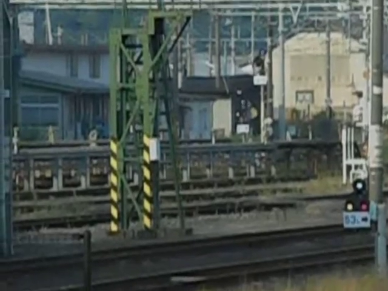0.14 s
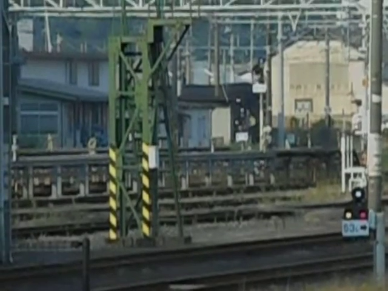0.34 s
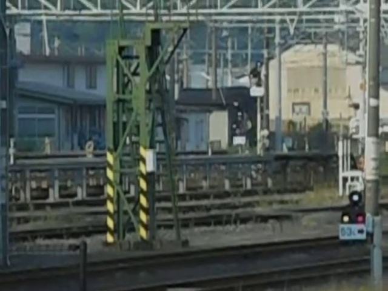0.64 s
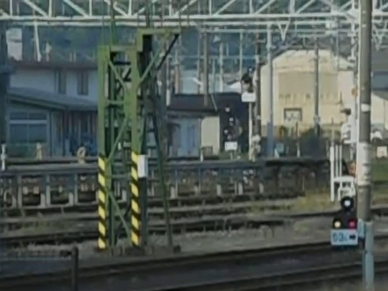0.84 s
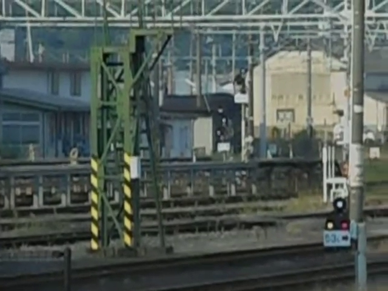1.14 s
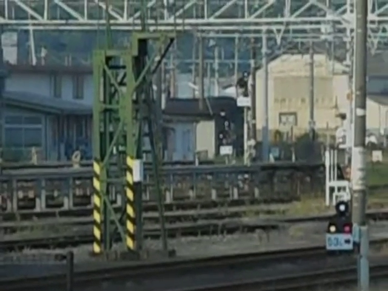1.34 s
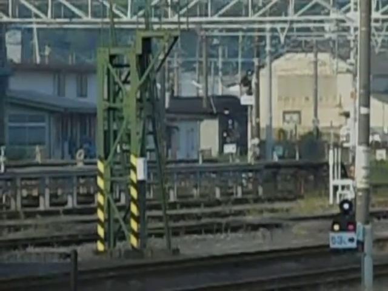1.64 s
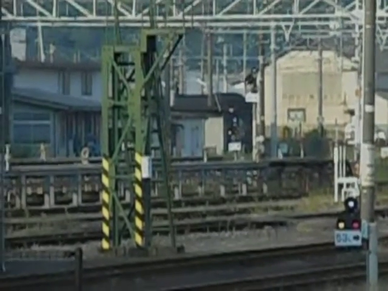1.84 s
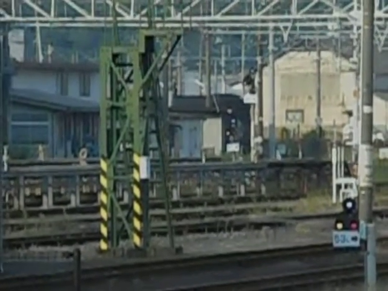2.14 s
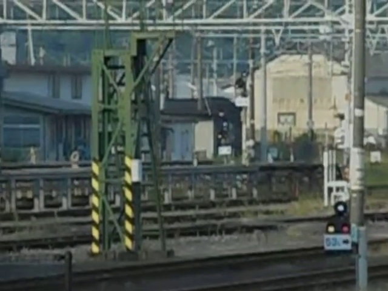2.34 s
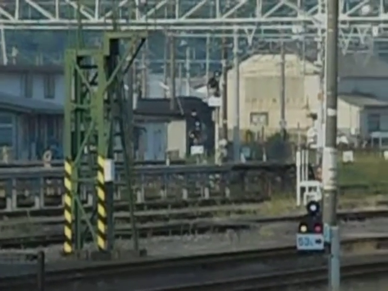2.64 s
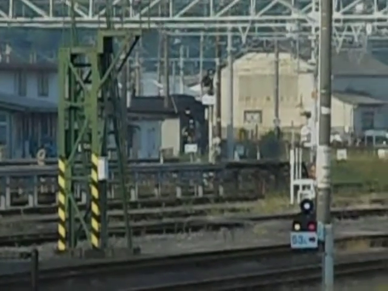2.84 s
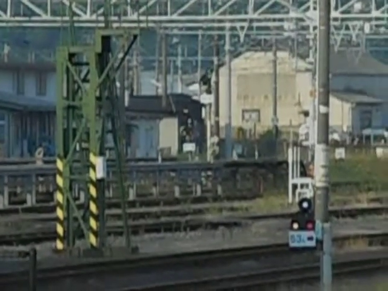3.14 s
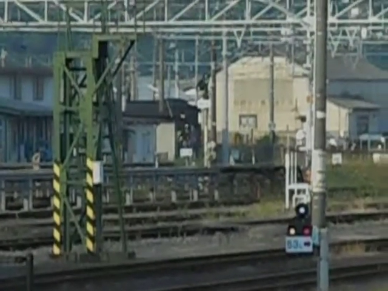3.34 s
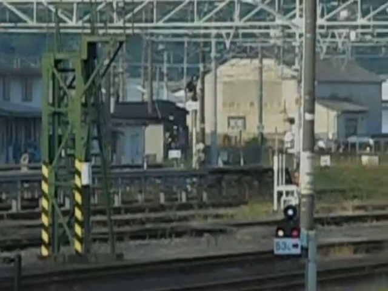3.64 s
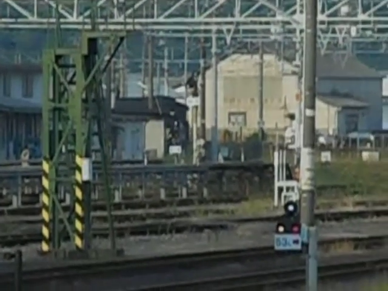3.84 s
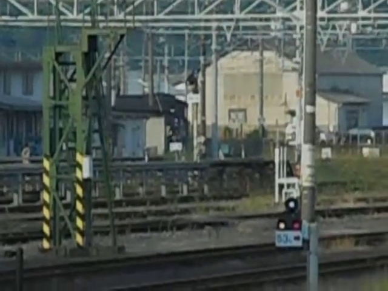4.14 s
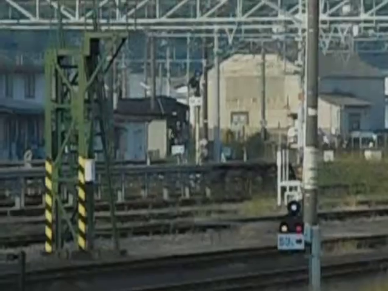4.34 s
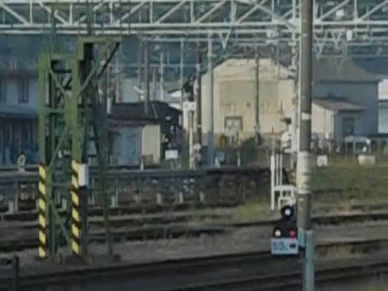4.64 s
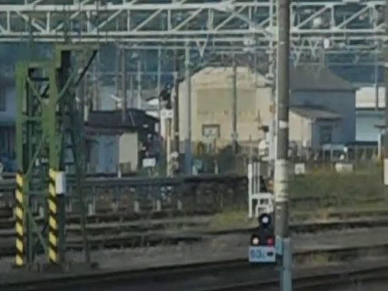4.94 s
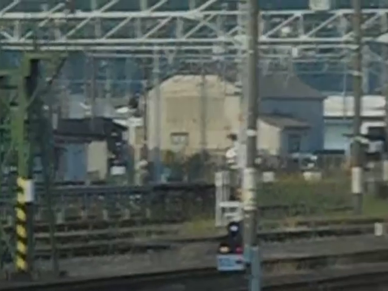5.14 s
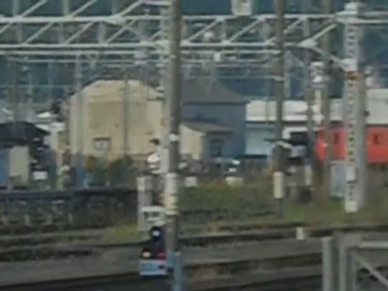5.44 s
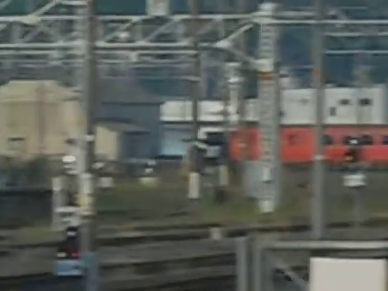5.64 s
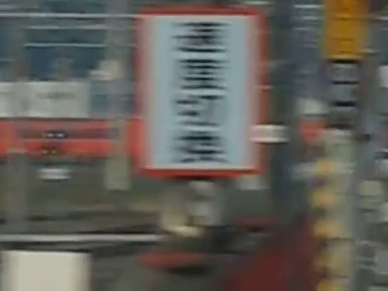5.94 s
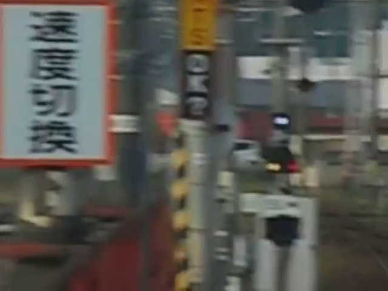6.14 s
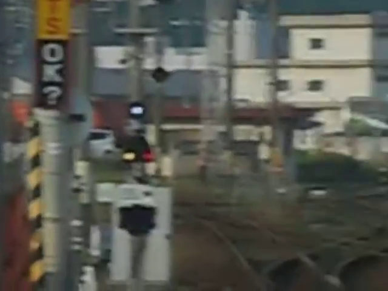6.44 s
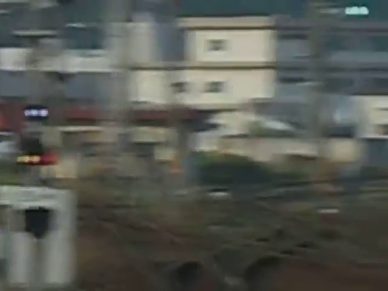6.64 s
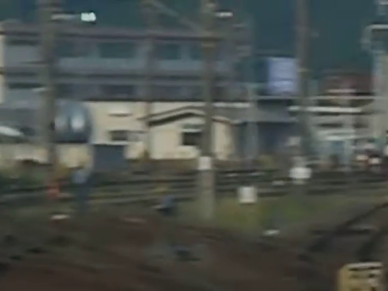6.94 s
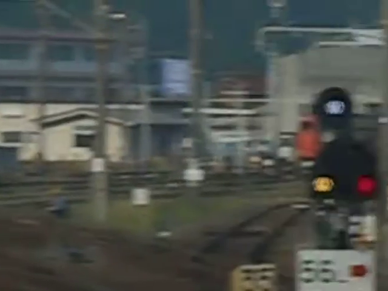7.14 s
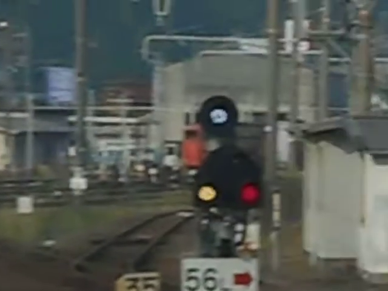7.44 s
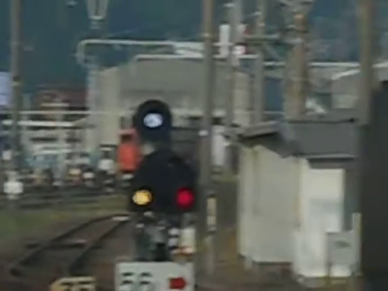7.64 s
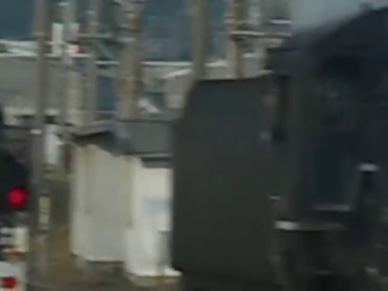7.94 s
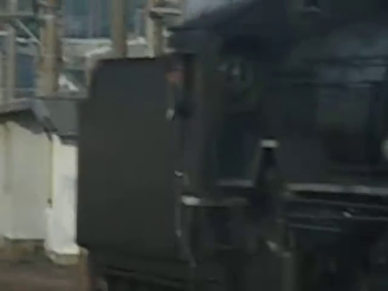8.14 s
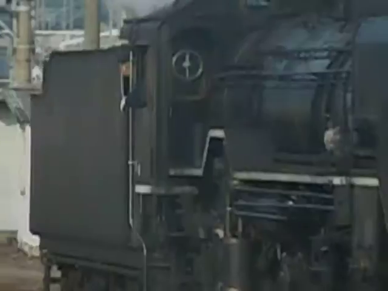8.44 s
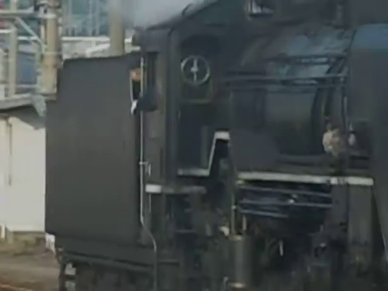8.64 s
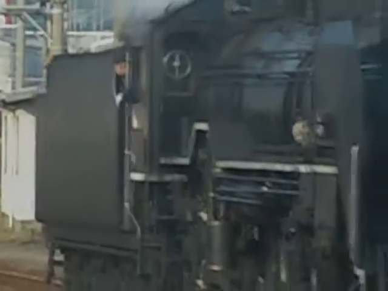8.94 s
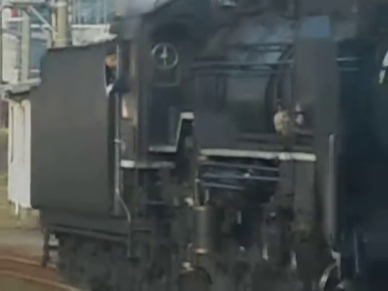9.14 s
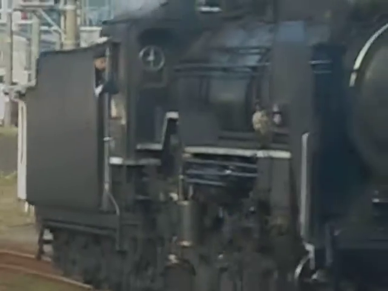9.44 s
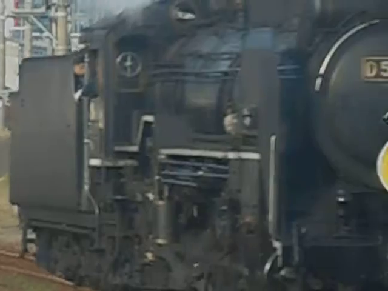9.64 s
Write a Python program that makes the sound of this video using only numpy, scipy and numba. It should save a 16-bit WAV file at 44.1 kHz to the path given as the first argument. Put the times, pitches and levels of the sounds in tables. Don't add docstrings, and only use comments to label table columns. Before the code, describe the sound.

Loud fluctuating steam jet snaps shut at three seconds, then slow locomotive wheels rumble, knock and clank over joints with squealing flange and groaning brake.

```python
import sys
import numpy as np
from scipy import signal
from scipy.fft import rfft, irfft, next_fast_len
from scipy.io import wavfile
from scipy.ndimage import uniform_filter1d
from numba import njit

SR = 44100
rng = np.random.default_rng(int(sys.argv[2]) if len(sys.argv) > 2 else 0)


def file_out(sig):
    cols = np.atleast_2d(sig).T
    lim = np.clip(cols, -1, 1)
    pcm = np.round(lim * 32767).astype(np.int16)
    wavfile.write(sys.argv[1], SR, pcm)


def to_linear_factor(level_db):
    exponent = np.asarray(level_db, float) / 20
    return 10 ** exponent


N = 431738
TIME = np.arange(N) / SR
FREQ = np.fft.rfftfreq(next_fast_len(N), 1 / SR) + 1e-3
JET_SHUT_S = 2.837


def unit(x):
    return x / np.sqrt(np.mean(x ** 2))


def curves(table):
    s, *columns = np.transpose(table)
    return [np.interp(TIME, s, column) for column in columns]


def walk(rate):
    hold = int(SR / rate)
    levels = np.repeat(rng.standard_normal(N // hold + 1), hold)
    return 1.3 * uniform_filter1d(uniform_filter1d(levels, hold), hold)[:N]


def gate(start, end):
    return np.interp(TIME, [start, start + 0.045, end - 0.04, end], [0, 1, 1, 0])


def shaped(gain):
    spectrum = rng.standard_normal(len(FREQ)) + 1j * rng.standard_normal(len(FREQ))
    return irfft(gain * spectrum, next_fast_len(N))[:N]


def colour(table):
    hz, db = np.transpose(table)
    return to_linear_factor(np.interp(np.log(FREQ), np.log(hz), db))


def resonance(hz, width):
    return 1 / (1 + (2 * (FREQ - hz) / width) ** 2)


def eddies(gain, lo_hz, hi_hz, shared_db, flicker_db, rate):
    out, shared = 0, walk(rate)
    for hz in lo_hz * 2 ** np.arange(0, np.log2(hi_hz / lo_hz) + 0.01, 0.5):
        window = np.cos(np.pi * np.clip(np.log2(FREQ / hz), -0.5, 0.5))
        swell_db = shared_db * shared + flicker_db * walk(rate)
        out = out + shaped(gain * window) * to_linear_factor(swell_db)
    return unit(out)


def narrow(table, swell_db, rate):
    out = 0
    for hz, width, db in table:
        out = out + to_linear_factor(db + swell_db * walk(rate)) * unit(shaped(resonance(hz, width)))
    return out


@njit
def svf(x, hz, width):
    y, band, low = np.empty(len(x)), 0., 0.
    for i in range(len(x)):
        g, k = np.tan(np.pi * hz[i] / SR), width / hz[i]
        v = (band + g * (x[i] - low)) / (1 + g * (g + k))
        band, low, y[i] = 2 * v - band, low + 2 * g * v, k * v
    return y


def add(out, s, sound):
    i = int(s * SR)
    out[i:i + len(sound)] += sound[:N - i]


def burst(hz, width_hz, t60, rise):
    t = TIME[:SR // 2]
    centre, width = hz + 0 * t, 1. * width_hz
    ring = svf(svf(rng.standard_normal(len(t)), centre, width), centre, width)
    return unit(ring) * (1 - np.exp(-t / rise)) * 1000 ** (-t / max(t60, 0.02))


def jet():
    # (time [s], level [dB], valve opening [0-1], nozzle resonance [Hz])
    blow = [
        (0, -4, 0.52, 5600),
        (.3, -4.5, 0.36, 5800),
        (1.05, -5, 0.2, 5500),
        (1.17, -7.5, 0.08, 5600),
        (1.33, -4, 0.82, 5470),
        (1.7, -4.5, 0.58, 5360),
        (2.25, -4, 0.2, 5240),
        (2.68, -3, 0.68, 4560),
        (2.85, -5.5, 0.82, 5600),
    ]
    # (frequency [Hz], density [dB per Hz])
    roar = [(410, -60), (700, -38), (1440, -26), (1750, -16), (2000, -17.5), (2420, -12.5), (2710, -12.5),
            (3360, -5.5), (5290, -4.5), (8890, -4), (10400, -10), (13500, -52), (22000, -120)]
    db, opening, hz = curves(blow)
    gain = colour(roar)
    core = eddies(gain, 4590, 6500, shared_db=0.48, flicker_db=1.66, rate=30)
    nozzle_hz = np.clip(hz * (1 + 0.043 * walk(6.9)), 2500, 8000)
    nozzle = unit(svf(core, nozzle_hz, 1360.0))
    low = eddies(gain, 783, 1600, shared_db=1.5, flicker_db=1.0, rate=18)
    mid = eddies(gain, 2270, 3200, shared_db=-0.7, flicker_db=1.0, rate=20)
    top = eddies(gain, 9000, 9100, shared_db=1.74, flicker_db=1.2, rate=12)
    since_shut = np.clip(TIME - JET_SHUT_S, 0, None)
    valve = np.exp(-since_shut / 0.016)
    echo = to_linear_factor(-14) * np.exp(-since_shut / 0.13)
    skirts = to_linear_factor(-28 + 5 * opening) * low + to_linear_factor(-12 + 9.5 * opening) * mid
    top = to_linear_factor(-8.5 + 7 * np.log2(hz / 5500)) * top
    body = unit(core + 0.75 * nozzle) + skirts
    return to_linear_factor(db + 1.5) * ((valve + echo) * body + (valve + 0.47 * echo) * top)


def rolling():
    # (frequency [Hz], density [dB per Hz])
    rough_rail = [(15, -56), (25, -24), (117, -11.5), (320, -5.5), (444, -6.5), (774, -2.5), (1380, -3),
                  (1610, 0.5), (1820, -3), (2070, -2), (3260, -1), (4760, -9.5), (6440, -10.5),
                  (8950, -26.5), (10400, -31.5), (13500, -64), (22000, -120)]
    # (centre [Hz], width [Hz], lift [dB])
    modes = [
        (640, 130, 3),
        (2077, 110, 2.5),
        (3350, 32, -10),
    ]
    # (time [s], level [dB])
    load = [(0, -35), (.7, -36.5), (1.3, -33.5), (2.1, -38.5), (2.9, -38.5), (3.3, -38.5), (3.95, -40),
            (4.5, -39.5), (4.75, -36.5), (5.1, -38.5), (6.5, -38), (6.85, -39.5), (7.25, -38),
            (7.55, -39.5), (8.45, -39), (9.2, -43.5), (9.79, -42.5)]
    # (time [s], lift [dB])
    puffs = [(3.07, 4), (3.4, 4.5), (3.65, 5), (3.92, 1), (4.04, 3.5), (4.21, 3.5), (4.66, -2), (4.81, 2.5),
             (5.34, 5), (5.6, 2.5), (5.95, 1), (6.38, 5), (7.0, 4.5), (7.36, 5), (8.1, 2), (8.3, 2),
             (8.45, 4), (8.63, 3.5), (8.79, 2), (8.9, 5.5), (9.04, 6), (9.42, 1)]
    lift = 1 + sum(0.5 * to_linear_factor(db) * resonance(hz, width) for hz, width, db in modes)
    gain = colour(rough_rail) * lift
    db, = curves(load)
    puffs_db = 0
    for s, up_db in puffs:
        rise, fall = (TIME - s) / 0.039, (s - TIME) / 0.046
        puffs_db = puffs_db + up_db * np.exp(np.minimum(rise, fall))
    rumble = eddies(gain, 199.4, 1150, shared_db=0.9, flicker_db=-0.24, rate=18)
    ground = eddies(gain, 25.4, 145, shared_db=0.6, flicker_db=0.7, rate=6)
    rush = eddies(gain, 1623, 3300, shared_db=0.18, flicker_db=1.18, rate=20)
    top = eddies(gain, 4580, 9100, shared_db=0.5, flicker_db=0.98, rate=20)
    since = TIME - JET_SHUT_S
    rush_db = -37 + 0.89 * (db - db.mean()) - 0.2057 * since
    top_db = -2 - 0.5 * since + 0.47 * puffs_db
    treble = to_linear_factor(puffs_db) * rush + to_linear_factor(top_db) * top
    return to_linear_factor(db + 0.2 * puffs_db) * rumble + to_linear_factor(rush_db) * treble + to_linear_factor(-55.5 + 0.09 * since) * ground


def knocks():
    # (time [s], peak [dB], ring [Hz], deep thud [dB])
    joints = [(0.191, -8.5, 375, -41), (0.412, -17, 1120, -46), (0.649, -17, 929, -42),
              (0.905, -11, 627, -22), (1.189, -17, 942, -31), (1.249, -15, 716, -33),
              (1.299, -15, 750, -40), (1.869, -19, 610, -42), (3.214, -26, 670, -38),
              (3.304, -22, 700, -48), (3.624, -21.5, 670, -35), (3.674, -18, 686, -49),
              (4.015, -23, 534, -34.5), (4.192, -22, 730, -41), (4.278, -25, 622, -46),
              (4.563, -27, 580, -46), (4.636, -19, 690, -27), (4.877, -22, 557, -41),
              (5.333, -22, 760, -49), (5.556, -26, 1110, -41), (5.771, -20.5, 770, -46),
              (5.823, -22.5, 725, -51), (5.969, -22.5, 935, -54), (6.418, -22, 845, -39),
              (7.247, -24.5, 580, -43), (7.369, -34, 657, -42), (8.619, -23, 1110, -38),
              (8.909, -26, 510, -38), (9.029, -24, 940, -47), (9.417, -24, 655, -39)]
    out, t60 = np.zeros(N), 0.21
    for s, db, hz, deep_db in joints:
        body = 0.5 * burst(hz, 180, t60, 0.0025) + 0.63 * burst(860, 1400, 0.84 * t60, 0.0021)
        add(out, s, to_linear_factor(db - 6.5) * body + to_linear_factor(deep_db) * burst(320, 390, t60, 0.0079))
    return out


def clanks():
    # (time [s], peak [dB], ring [Hz], top [dB])
    blows = [(3.0614, -12.5, 3360, -36), (3.2104, -18, 3528, -52), (3.2535, -11, 3460, -45),
             (3.3414, -11.5, 2090, -41), (3.3833, -13, 3220, -48), (3.4927, -11, 4190, -37),
             (3.5645, -19, 2610, -42), (3.6104, -19, 4200, -45), (3.6794, -20, 2080, -46),
             (4.0274, -17, 3300, -59), (4.172, -18, 3350, -41), (4.199, -20, 2500, -41),
             (4.4804, -17, 3300, -61), (4.6497, -11.5, 3730, -27), (4.784, -14, 5070, -47),
             (4.8405, -14, 3170, -55), (5.328, -14, 1660, -46), (5.3884, -16.5, 3360, -47),
             (5.439, -13.5, 4740, -23), (5.5594, -19.5, 4360, -43), (5.9321, -21, 3310, -56),
             (6.3303, -21, 3330, -43), (6.9406, -17, 1890, -51.5), (6.9994, -23, 2060, -46),
             (7.347, -21, 3360, -47), (7.3818, -17, 3210, -46), (7.7056, -22, 3000, -47),
             (7.7868, -24, 2900, -51.5), (8.623, -16, 2780, -49), (9.0294, -24, 1970, -47)]
    out, t60 = np.zeros(N), 0.12
    for s, db, hz, top_db in blows:
        body = 0.92 * burst(hz, 600, t60, 0.0025) + 0.8 * burst(2800, 4400, 1.05 * t60, 0.0023)
        add(out, s, to_linear_factor(db - 13.0) * body + to_linear_factor(top_db - 4.0) * burst(6700, 2700, 1.14 * t60, 0.0082))
    return signal.sosfilt(signal.butter(2, 8000, fs=SR, output="sos"), out)


def booms():
    # (time [s], peak [dB])
    tank_blows = [(1.259, -28), (1.404, -31), (1.884, -31), (3.049, -40), (4.021, -33), (4.208, -29.5),
                  (4.483, -31), (5.025, -33), (5.269, -45), (5.38, -46), (5.564, -34), (6.098, -36),
                  (6.419, -47), (7.367, -36), (7.928, -57), (9.417, -47)]
    out = np.zeros(N)
    for s, db in tank_blows:
        add(out, s, to_linear_factor(db - 5) * burst(334, 60, 0.33, 0.012))
    return out


def slip(hz, bites, wobble, rough_db, high_db):
    drift = wobble * walk(150) + 0.3 * wobble * walk(14)
    phase = 2 * np.pi * np.cumsum(hz * (1 + drift)) / SR
    first, second, third, fourth = (to_linear_factor(rough_db * walk(45)) * np.sin(k * phase) for k in range(1, 5))
    upper = second + to_linear_factor(high_db) * (third + fourth)
    out = 0
    for s, length, db, octave_db in bites:
        out = out + gate(s, s + length) * (to_linear_factor(db) * first + to_linear_factor(octave_db) * upper)
    return to_linear_factor(2.0) * out


def squeal():
    # (start [s], length [s], level [dB], octave [dB])
    flange_bites = [
        (3.199, 0.86, -51, -51),
        (3.183, .17, -52, -45),
        (3.292, 0.27, -39.5, -37),
        (3.525, 0.15, -50, -43),
        (3.6, .24, -43.5, -48),
        (3.817, 0.19, -44, -36.5),
        (3.96, 0.15, -53, -42.5),
    ]
    return slip(2120, flange_bites, wobble=0.015, rough_db=2.5, high_db=-19)


def groan():
    # (start [s], length [s], level [dB], octave [dB])
    block_bites = [
        (7.848, 1.9, -53, -56.5),
        (8.2, .32, -57, -60),
        (8.47, 0.26, -44, -48),
        (8.7, 0.16, -47, -49),
        (8.84, 0.11, -41.5, -50),
        (8.904, 0.23, -48, -44.5),
        (9.115, .22, -43.5, -53),
        (9.33, 0.097, -44, -52),
        (9.427, 0.2, -51, -60),
    ]
    return slip(516, block_bites, wobble=0.01, rough_db=2.3, high_db=-14)


def whines():
    # (start [s], end [s], centre [Hz], width [Hz], level [dB])
    lines = [
        (8.2, 9.79, 1147, 22, -51.5),
        (7.0, 9.79, 1222, 14, -55),
        (8.26, 8.56, 4280, 60, -44.5),
        (3.05, 3.95, 3365, 70, -46),
        (6.11, 6.23, 4330, 50, -47),
        (2.4, 3.5, 478, 9, -46),
        (9.02, 9.12, 930, 30, -43),
        (8.3, 9.7, 2780, 30, -57),
    ]
    return sum(gate(start, end) * narrow([line], swell_db=1.1, rate=18) for start, end, *line in lines)


def steel_rings():
    # (centre [Hz], width [Hz], level [dB])
    ring_lines = [(2407, 12, -56), (2008, 30, -57), (1653, 20, -57), (1444, 12, -55), (765, 25, -57),
                  (3362, 60, -50.5)]
    slowing = to_linear_factor(np.interp(TIME, [4, 8.5, 9.79], [2, -1, -6]))
    return slowing * narrow(ring_lines, swell_db=1.6, rate=8)


def sparrow():
    # (time [s], peak [dB], pitch [Hz])
    chirps = [(4.141, -26, 4380), (4.7835, -28, 4960), (4.8434, -24, 4880), (5.1836, -24.5, 5020),
              (5.219, -36, 5030), (5.2444, -24.5, 5100), (5.6057, -26, 5240), (8.0993, -26.5, 4470),
              (8.1489, -29, 4500), (8.243, -28, 4260), (8.4996, -27, 4270), (8.551, -30, 4240),
              (8.5964, -30, 4660), (8.6487, -32, 4300), (8.6971, -29, 4530), (8.746, -30, 4220)]
    out, t = np.zeros(N), TIME[:SR // 25]
    for s, db, hz in chirps:
        phase = 2 * np.pi * np.cumsum(hz * (1.15 - 40 * t)) / SR
        note = np.exp(-((t - 0.004) / 0.003) ** 2) * np.sin(phase)
        add(out, s, to_linear_factor(db - 12.5) * note)
        add(out, s, to_linear_factor(db - 4.5) * burst(hz, 800, 0.075, 0.002))
    return out


def crickets():
    # (centre [Hz], width [Hz], level [dB])
    choirs = [
        (6228, 130, -54.5),
        (5640, 110, -64),
    ]
    return narrow(choirs, swell_db=1.3, rate=10)


def scene():
    train = jet() + rolling() + knocks() + clanks() + booms()
    friction = squeal() + groan() + whines()
    return (train + friction + steel_rings() + sparrow() + crickets())[None]


def band_limit(x):
    return signal.sosfilt(signal.butter(12, 12390, fs=SR, output="sos"), x)


def record(dry):
    cut_hz = [9200, 10000, 10500, 10750, 10900, 11000]
    image_hz = [11025, 11300, 11500, 11800, 12000, 12300, 13000]
    size = next_fast_len(N)
    ducked = dry * to_linear_factor(np.interp(TIME, [2.87, 3.092], [-24.5, 0]))
    kept = rfft(ducked, size) * to_linear_factor(np.interp(FREQ, cut_hz, [0.8, -3, -9.5, -14, -23, -50]))
    mirror_db = np.interp(FREQ, image_hz, [-10, -10, -11, -16, -23, -33, -80])
    image = kept[:, ::-1].conj() * to_linear_factor(mirror_db) * (FREQ > SR / 4)
    mix = irfft(kept + image, size)[:, :N]
    return band_limit(mix)


dry = scene()
out = record(dry)
file_out(out)
```